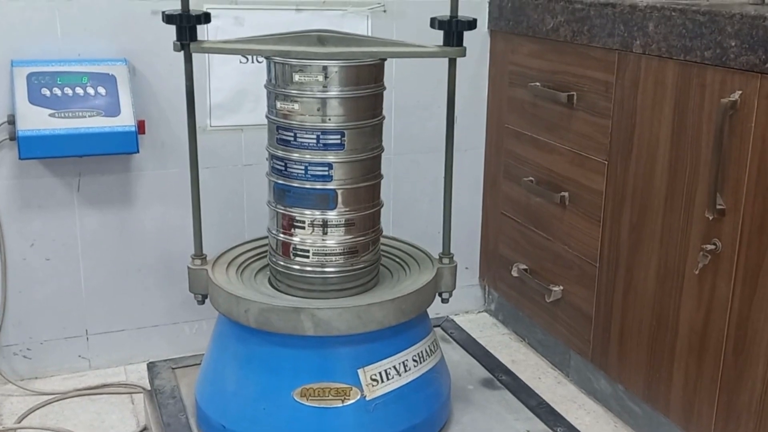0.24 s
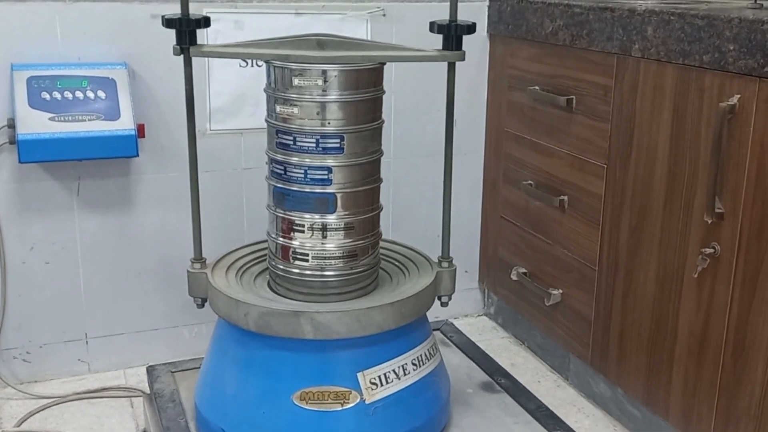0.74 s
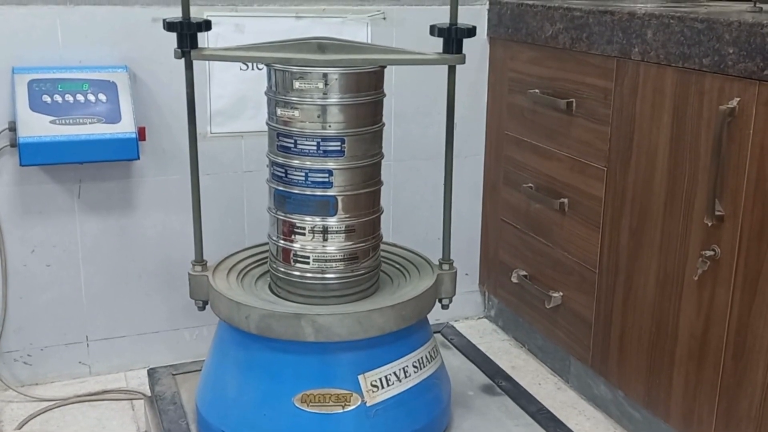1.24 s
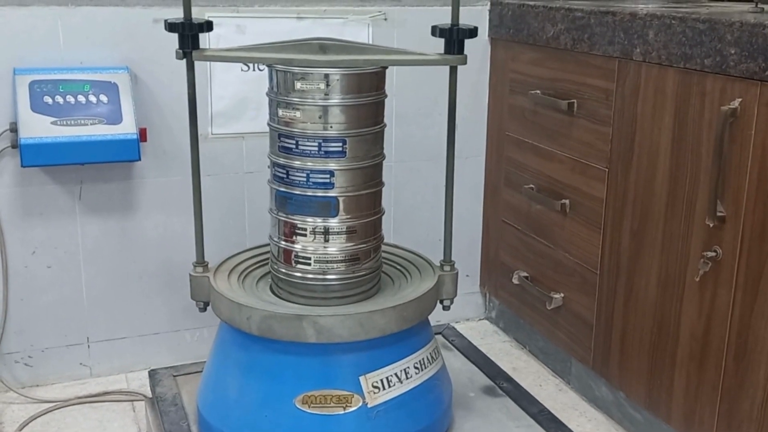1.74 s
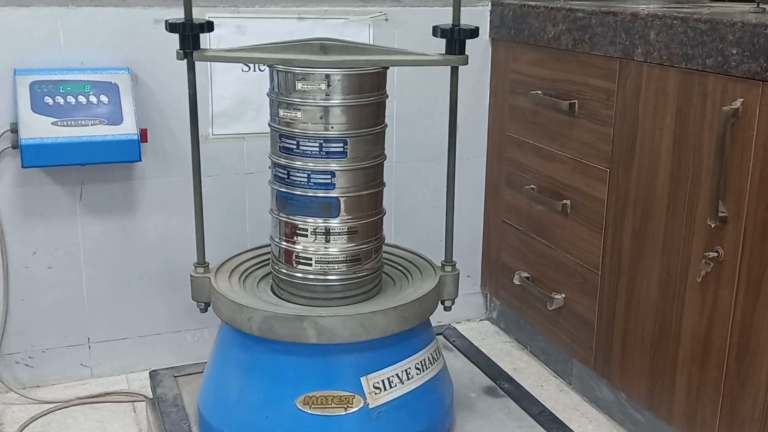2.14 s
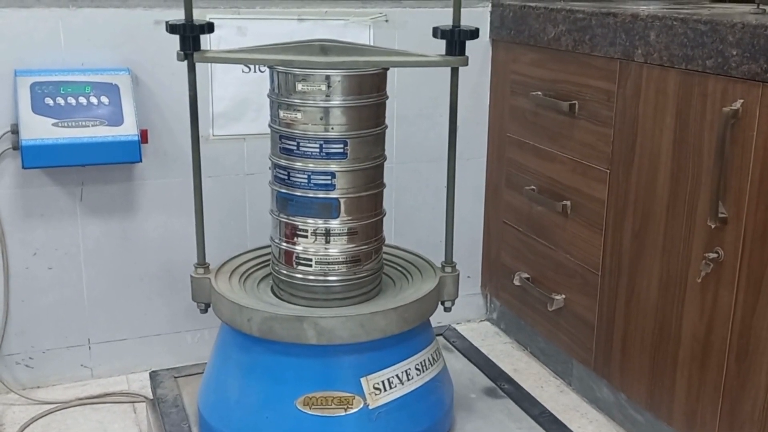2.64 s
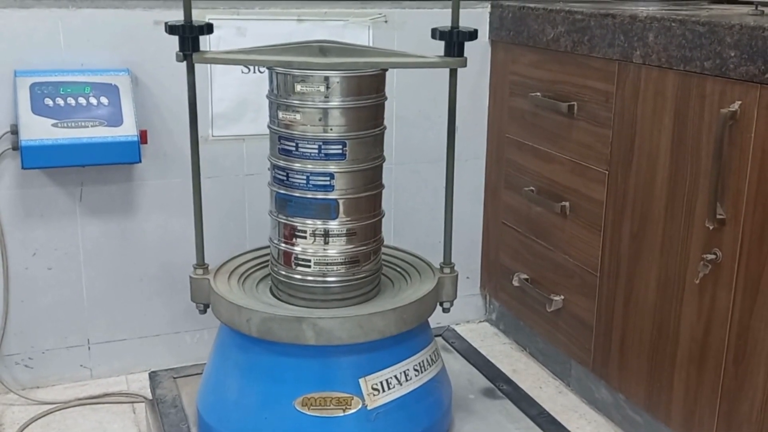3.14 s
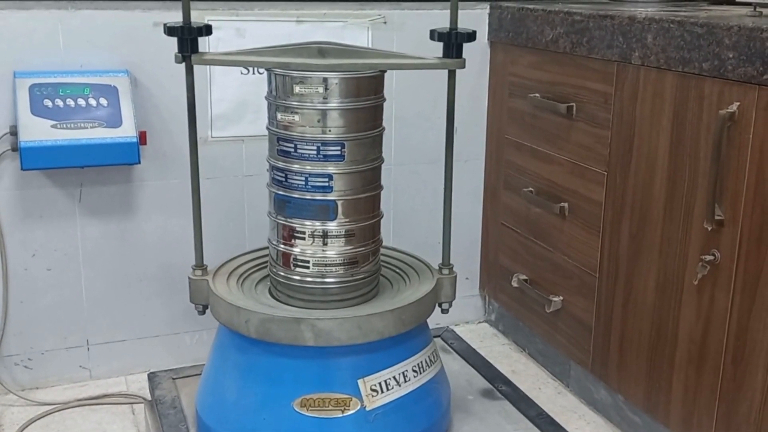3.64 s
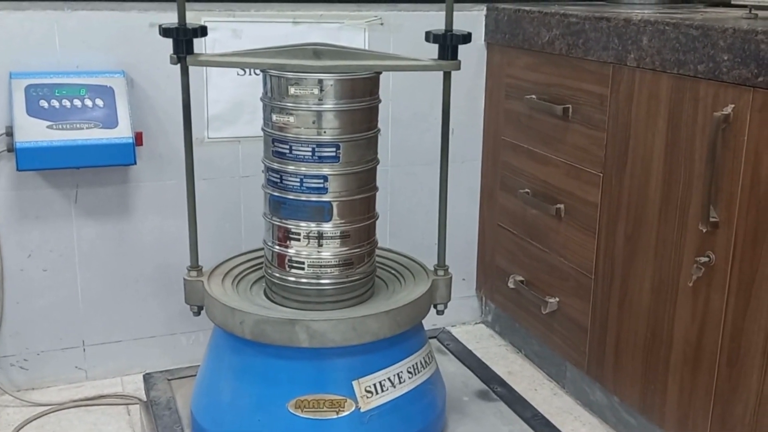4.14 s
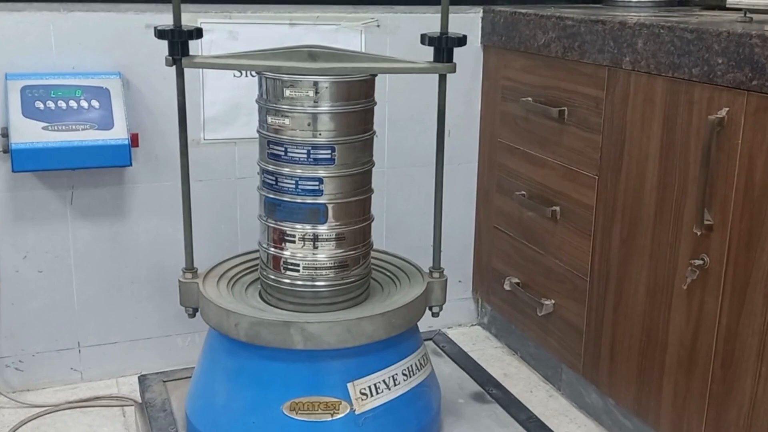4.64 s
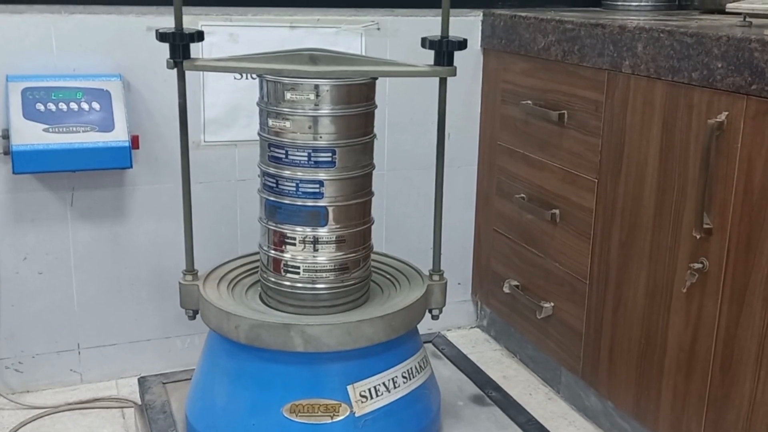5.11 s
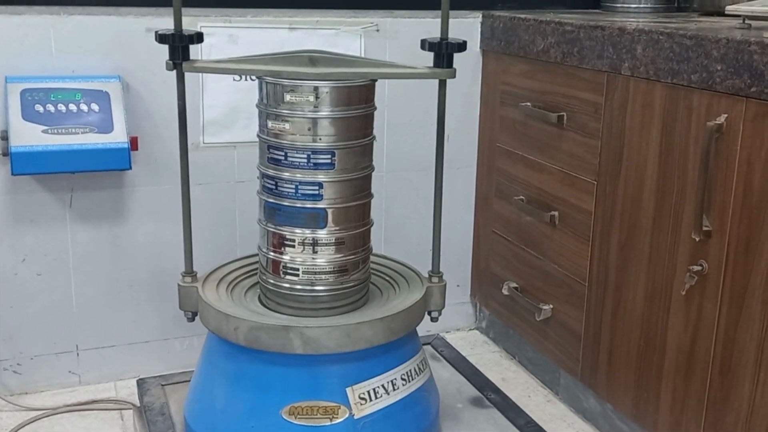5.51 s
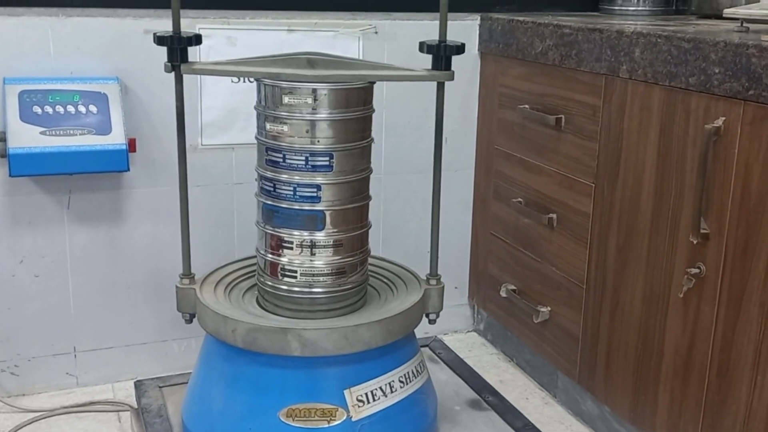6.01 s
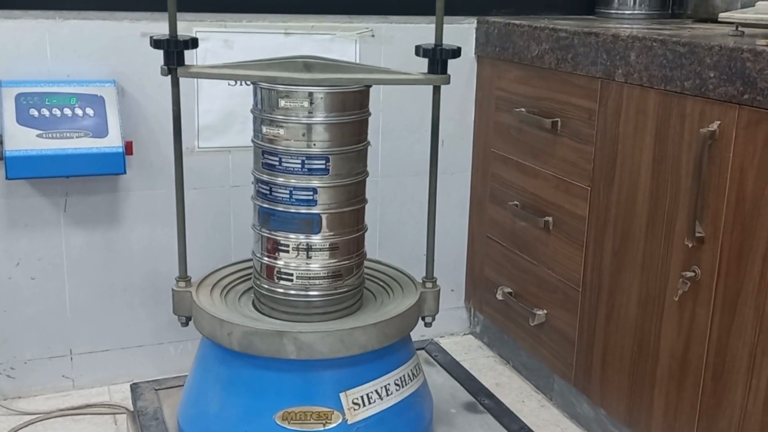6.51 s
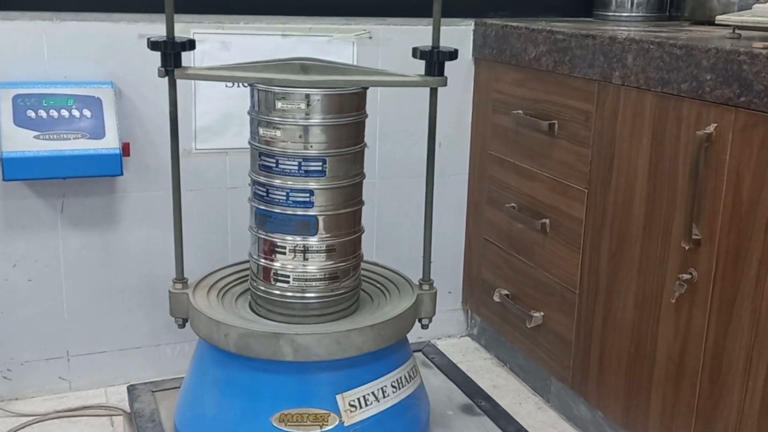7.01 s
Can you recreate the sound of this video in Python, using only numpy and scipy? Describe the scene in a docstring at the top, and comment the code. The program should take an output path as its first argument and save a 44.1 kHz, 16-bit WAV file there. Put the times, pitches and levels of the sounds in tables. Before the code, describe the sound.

A sieve shaker runs steadily in a small laboratory, heard from nearby. Its low electric hum sits under a dense, even hiss of soil bouncing on a stack of metal sieves. The steel frames ring faintly, and a thin high whistle flares now and then. Near the end comes a soft, dull knock, then the machine sound cuts off abruptly, leaving quiet room tone.

```python
"""Sieve shaker in a small laboratory.

An electromagnetic shaker's magnet hums at twice the mains frequency, with a slow throb, over
the rumble of its base. Soil, tossed once a mains cycle, hisses on the wire meshes, sounds the
steel frames and keeps one fine mesh ringing. Near the end: a soft knock, then a cut to a quiet room."""
import sys
import numpy as np
from scipy import signal
from scipy.fft import rfft, irfft
from scipy.io import wavfile
from scipy.ndimage import uniform_filter1d

SR = 44100
rng = np.random.default_rng(int(sys.argv[2]) if len(sys.argv) > 2 else 0)


def store_wav(level_fs):
    """Save 16-bit WAV to argv[1]."""
    pcm = np.round(np.clip(np.atleast_2d(level_fs), -1, 1) * 32767)
    wavfile.write(sys.argv[1], SR, pcm.T.astype(np.int16))


N = 320166
HZ = np.fft.rfftfreq(N, 1 / SR)
TIME = np.arange(N) / SR
MAINS_HZ = 50.1
THROB_HZ, LULL_S = 2.68, 1.49  # throb rate, time of one of its minima


def gain_of(db):
    """Decibels to amplitude."""
    return 10 ** (np.asarray(db) / 20)


def unit_rms(x):
    """Scales to rms 1."""
    return x / np.sqrt(np.mean(x ** 2) + 1e-20)


def over_hz(points):
    """Interpolates a table along log frequency."""
    hz, value = np.transpose(points)
    return np.interp(np.log(HZ + 1), np.log(hz + 1), value)


def over_time(points):
    """Interpolates a table at every sample."""
    return np.interp(TIME, *np.transpose(points))


def drift(hz):
    """Slow random curve of rms 1, no faster than about hz."""
    return unit_rms(irfft(rfft(rng.standard_normal(N)) * np.exp(-(HZ / hz) ** 2), N))


def resonance(hz, width_hz):
    """Power response of one mode."""
    return 1 / (1 + (2 * (HZ - hz) / width_hz) ** 2)


def standing_waves(ripple_db=1.5, spacing_hz=18):
    """The small hard room ripples the spectrum finely, differently along each path."""
    ripple = uniform_filter1d(rng.standard_normal((2, len(HZ))), int(spacing_hz / HZ[1]))
    return gain_of(ripple_db * unit_rms(ripple) * HZ / (HZ + 800))


# Likeness of the channels. Each row: frequency in Hz, coherence.
COHERENCE = [(25, 0.64), (100, 0.57), (155, 0.86), (215, 1), (400, 0.89), (640, 0.58), (820, 0.9),
             (1020, -0.09), (1300, 0.48), (1820, -0.3), (2100, 0.41), (3250, 0.16), (4400, -0.076),
             (6600, 0.17), (7450, 0.64), (8000, 0.99), (11500, 0.71), (12800, 0.98), (14500, 0.44),
             (16000, .4)]
# Stereo balance. Each row: frequency in Hz, left minus right in dB.
BALANCE = [(300, 0), (1050, 1.5), (1800, 0.5), (2100, -1.5), (2700, -1), (3600, -5.5), (6000, -4),
           (8000, -2.5), (9100, -10), (10200, -6), (11800, 0)]
# Phase between the channels. Each row: frequency in Hz, lead of the left in radians.
PHASE_LEAD = [(100, 0.24), (800, -0.06), (2300, 0), (2900, 0.17), (3400, 2.5), (4000, 2.5), (4600, 1.5),
              (5200, -1.1), (7000, 1), (7800, 0)]


def stereo(pair, colour):
    """Colours two unrelated signals and blends them into left and right, at rms 1."""
    a, b = rfft(pair) * standing_waves()
    coherence, lean_db = np.clip(over_hz(COHERENCE), -1, 1), over_hz(BALANCE)
    mid, side = np.sqrt(1 + coherence) * a, np.sqrt(1 - coherence) * b
    pan = gain_of([lean_db / 2, -lean_db / 2])
    pan /= np.linalg.norm(pan, axis=0)
    left, right = (mid + side) * np.exp(1j * over_hz(PHASE_LEAD)), mid - side
    return unit_rms(irfft(np.array([left, right]) * pan * colour, N))


# Spectrum of the quiet room. Each row: frequency in Hz, relative density in dB.
ROOM_SPECTRUM = [(25, -20), (100, -10), (350, -3), (600, -12), (950, -5), (1500, -15), (4000, -21.5),
                 (6000, -32), (15000, -38)]


def room_tone(air_db=-47, hum_db=-48):
    """Dull steady background of the laboratory, with a faint mains hum."""
    air = stereo(rng.standard_normal((2, N)), gain_of(over_hz(ROOM_SPECTRUM)))
    hum = unit_rms(np.sin(2 * np.pi * 2 * MAINS_HZ * TIME))
    return gain_of(air_db) * air + gain_of(hum_db) * hum


# One soft knock. Each row: start in seconds, level in dB.
KNOCKS = [(6.981, -29.5)]
# Its modes. Each row: frequency in Hz, relative level in dB, T60 in seconds.
KNOCK_MODES = [(330, -3, .025), (422, 1, 0.024), (560, -2, 0.02), (756, -6, .018), (1000, -4, .016)]


def knock():
    """A dull, quickly damped bump somewhere nearby."""
    out = np.zeros(N)
    for start_s, level_db in KNOCKS:
        age_s = np.maximum(TIME - start_s, 0)
        for k, (hz, mode_db, t60_s) in enumerate(KNOCK_MODES):
            envelope = gain_of(level_db + mode_db - 60 * age_s / t60_s)
            out += (-1) ** k * envelope * np.sin(2 * np.pi * hz * age_s)
    return out


def base_rumble(level_db=-59, hz=210, width_hz=70, throb_db=6, flutter_db=3.0, flutter_hz=7):
    """A dull, fluttering rumble of the base that sinks at each lull of the throb."""
    lull = np.cos(2 * np.pi * THROB_HZ * (TIME - LULL_S))
    noise = stereo(rng.standard_normal((2, N)), resonance(hz, 2 * width_hz) ** 2)
    envelope = gain_of(flutter_db * drift(flutter_hz) - throb_db * lull)
    return gain_of(level_db) * unit_rms(noise * envelope)


# Strength of the magnet's stroke. Each row: time in seconds, hum level in dB.
STROKE = [(0.05, -32.5), (1.01, -34), (2.62, -34.5), (3.21, -32), (3.72, -34.5), (3.76, -33), (6.71, -33.5),
          (7.1, -34)]
# Hum partials. Each row: multiple of the mains frequency, relative level in dB, waver depth, throb depth.
HUM_PARTIALS = [(1, -49, .3, 0), (2, 2, 0.013, 0), (3, -26, 0.3, 0), (4, -24.5, 0.1, .95), (5, -35, .3, 0),
                (6, -22, 0.35, 0), (7, -21.7, 0.4, 0), (8, -26, .7, .8), (11, -34, .3, 0)]


def magnet_hum(lean_db=1.14, waver_hz=3):
    """A firm tone at twice mains frequency; the bouncing load makes the other partials waver. Two throb."""
    hum = np.zeros(N)
    beat = np.exp(-2j * np.pi * THROB_HZ * (TIME - LULL_S))
    for order, db, waver, throb in HUM_PARTIALS:
        sway = 1 + waver * (drift(waver_hz) + 1j * drift(waver_hz)) - throb * beat
        carrier = np.exp(2j * np.pi * (order * MAINS_HZ * TIME + rng.random()))
        hum += gain_of(db) * (sway * carrier).real
    pan = gain_of([[lean_db / 2], [-lean_db / 2]])
    return unit_rms(hum) * gain_of(over_time(STROKE)) * pan


# Briskness of the soil's motion. Each row: time in seconds, level in dB.
SOIL_FLOW = [(0.0, -32.5), (0.15, -34), (0.55, -33.5), (1.0, -35), (1.35, -34.5), (1.52, -35), (2.6, -34.5),
             (3.15, -33.5), (3.7, -33.5), (4.65, -33), (5.3, -34), (5.6, -33.5), (6.25, -34), (7.15, -33.5)]


def briskness_db():
    """The soil's motion relative to its mean level."""
    flow_db = over_time(SOIL_FLOW)
    return flow_db - flow_db.mean()


# Swells of single resonances, and one dip.
# Each row: centre in seconds, length in seconds, pitch in Hz, peak lift in dB.
SWELLS = [(.07, .2, 698, 9), (0.12, 0.35, 808, 8), (0.25, 0.9, 1382, 10.5), (.32, .16, 698, 10),
          (0.68, .3, 2084, -9), (.78, 0.49, 7520, 6), (.83, .14, 698, 5), (1.22, 0.36, 283, 12.5),
          (1.403, 0.38, 7630, 7.5), (2.54, 0.11, 7640, 8), (2.79, .26, 2084, 10), (2.83, .2, 7635, 6),
          (2.995, 0.2, 810, 6.5), (3.2, 0.23, 7630, 4), (3.24, 0.13, 694, 14), (3.27, 0.45, 2084, 10.5),
          (3.356, .18, 808, 9), (3.6, 0.17, 808, 10.5), (3.66, 0.13, 686, 15), (3.83, 0.36, 2084, 10),
          (4.38, 0.23, 7600, 6), (4.645, .15, 7590, 7), (4.75, 0.3, 1382, 14), (4.8, .25, 2084, 8),
          (4.98, 0.27, 7590, 9.5), (5.1, .15, 1385, 11), (5.157, 0.2, 7500, 10), (5.32, 0.33, 808, 7),
          (5.605, 0.16, 7520, 13), (5.718, 0.13, 7500, 11), (5.79, 0.14, 2084, 12), (6.06, 0.54, 7720, 8),
          (6.29, 0.089, 7635, 5), (6.4, .16, 698, 14), (6.628, .26, 7600, 8), (6.93, 0.19, 283, 7),
          (7.027, 0.14, 7635, 6), (7.128, .16, 808, 6.5)]


def swell_db(hz, reach_hz=85):
    """Lift of the resonance at hz: each swell is one smooth arch, shared by close neighbours."""
    lift_db = np.zeros(N)
    for centre_s, length_s, pitch_hz, peak_db in SWELLS:
        share = np.exp(-((pitch_hz - hz) / reach_hz) ** 2)
        if share > 0.05:
            arch = np.cos(np.pi * np.clip((TIME - centre_s) / length_s, -0.5, 0.5))
            lift_db += share * peak_db * arch
    return lift_db


def ringing(colour, hold_s):
    """A sharp mode fed by countless small blows, its strength held even over hold_s."""
    ring = stereo(rng.standard_normal((2, N)), colour)
    power = uniform_filter1d((ring ** 2).mean(0), int(hold_s * SR))
    return ring / np.sqrt(power + 1e-9)


# Rim modes. Each row: frequency in Hz, nominal width in Hz, base level in dB, rms wander in dB.
RIM_MODES = [(282.5, 4, -60, 1.5), (698, 13, -64, 1.5), (807, 14, -57, 1.7), (1389, 22, -56, 0.7),
             (2075, 44, -53.7, 1)]


def rim_ring(follow=0.87, wander_hz=3):
    """The clamped stack sings faintly at a few pitches that swell and fade as the load shifts."""
    out = np.zeros((2, N))
    for hz, width_hz, level_db, wander_db in RIM_MODES:
        ring_db = level_db + follow * briskness_db() + wander_db * drift(wander_hz) + swell_db(hz)
        out += ringing(resonance(hz, 2 * width_hz) ** 2, hold_s=0.11) * gain_of(ring_db)
    return out


# Close modes of the fine mesh. Each row: frequency in Hz, nominal width in Hz, relative level in dB.
MESH_MODES = [(7508, 17, -1.5), (7588, 22, -1.5), (7635, 14, 0.5), (7682, 26, -3.5), (7730, 70, -7.5)]


def mesh_ring(level_db=-45.5, follow=0.64, sputter_db=2.5, sputter_hz=12, wander_db=0.5, wander_hz=4):
    """Sharp modes beat and sputter as the soil feeds them, at times flaring into a thin whistle."""
    out = np.zeros((2, N))
    for hz, width_hz, mode_db in MESH_MODES:
        ring_db = mode_db - wander_db * drift(wander_hz) + swell_db(hz)
        out += ringing(resonance(hz, 1.8 * width_hz) ** 1.4, hold_s=0.035) * gain_of(ring_db)
    sputter = 1 - np.hypot(drift(sputter_hz), drift(sputter_hz))
    return out * gain_of(level_db + follow * briskness_db() + sputter_db * sputter)


def grain_impacts(toss_db, clump_db, hits_per_s=30000, clump_hz=27):
    """Dense impacts of uneven size, strongest each time the soil lands and when it moves in clumps."""
    hits = rng.random((2, N)) < hits_per_s / SR
    size = gain_of(1.1 * np.minimum(rng.exponential(1, (2, N)), 5))
    clicks = unit_rms(hits * size * rng.standard_normal((2, N)))
    landing = np.cos(2 * np.pi * MAINS_HZ * TIME)
    return clicks * gain_of(toss_db * landing + clump_db * drift(clump_hz))


def soil_shift(pair, span_hz, span_s, depth_db=1.5):
    """Soil shifting over the meshes favours now one band, now another."""
    hz, times, spectra = signal.stft(pair, SR, nperseg=512)
    patches = rng.standard_normal((len(times), len(hz)))
    patches = uniform_filter1d(patches, int(span_s / times[1]), axis=0)
    patches = unit_rms(uniform_filter1d(patches, int(span_hz / hz[1]), axis=1))
    return signal.istft(spectra * gain_of(depth_db * patches.T), SR, nperseg=512)[1][:, :N]


# Broad spectrum of the sieve stack. Each row: frequency in Hz, relative density in dB.
STACK_SPECTRUM = [(20, -16.5), (90, -3.5), (150, -7.5), (220, -13.5), (310, -7.5), (500, -6), (620, -12),
                  (1130, -10), (1300, -9.5), (2300, -4.5), (3100, -0.86), (4300, -3), (7200, -4),
                  (8000, -3), (9300, 1.2), (12000, -2.5), (14200, -8.5)]
# Modes of frames, pan and lid. Each row: frequency in Hz, width in Hz, lift in dB.
FRAME_MODES = [(375, 6, 6), (395, 7, 4.5), (422, 4.2, 7), (484, 12, 4), (698, 17, 5), (793, 30, 1.5),
               (1264, 50, 6.5), (1305, 40, 6.5), (1387, 42, 9.5), (1521, 44, 10), (1612, 50, 8),
               (1675, 60, 5), (1825, 90, 3.5), (1896, 40, 4.5), (2086, 48, 7.5), (2499, 20, 5),
               (2660, 45, 3.5), (2768, 18, 4), (2880, 40, 2), (3013, 30, 3), (3248, 45, 5), (3390, 40, 3),
               (3505, 60, 3.5), (3573, 18, 5.5), (3630, 25, 3), (4365, 30, 3), (5070, 40, 2.5),
               (5280, 250, 1.8)]


def soil_hiss(coarse_db=4.0, fine_db=-2.5, split_hz=7600, follow=0.87, skitter_db=0.5, skitter_hz=6):
    """Coarse grains sound the steel frames; fine grains fizz above them, skittering in little surges."""
    modes_db = sum(lift_db * resonance(hz, width_hz) for hz, width_hz, lift_db in FRAME_MODES)
    stack = gain_of(over_hz(STACK_SPECTRUM) + modes_db)
    low_share = 1 / (1 + (HZ / split_hz) ** 8)
    coarse = soil_shift(grain_impacts(toss_db=0.3, clump_db=0.15), span_hz=110, span_s=0.05)
    fine = soil_shift(grain_impacts(toss_db=1.0, clump_db=1.26), span_hz=550, span_s=0.036)
    flow_db = over_time(SOIL_FLOW)
    fizz_db = flow_db.mean() + follow * briskness_db() + skitter_db * drift(skitter_hz)
    frames = stereo(coarse, stack * np.sqrt(low_share)) * gain_of(flow_db + coarse_db)
    fizz = stereo(fine, stack * np.sqrt(1 - low_share)) * gain_of(fizz_db + fine_db)
    return frames + fizz


def scene(cut_s=7.178, fade_s=0.0032):
    """The running shaker, then an abrupt cut to the quiet room."""
    running = np.exp(-np.maximum(TIME - cut_s, 0) / fade_s)
    shaker = magnet_hum() + base_rumble() + soil_hiss() + rim_ring() + mesh_ring()
    return (shaker + knock()) * running + room_tone() * (1 - running)


def record(dry):
    """Steep low-pass on the top treble."""
    cutoff_hz = 15850
    lowpass = signal.firwin(511, cutoff_hz, window=("kaiser", 9), fs=SR)
    return signal.oaconvolve(dry, lowpass[None], "same")


dry = scene()
out = record(dry)
store_wav(out)
```